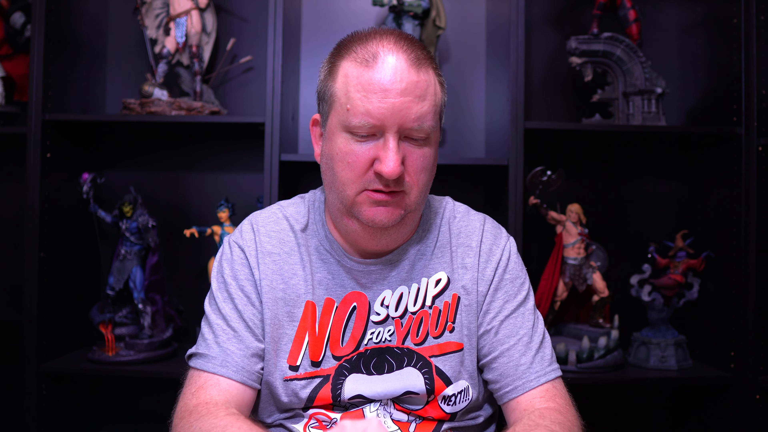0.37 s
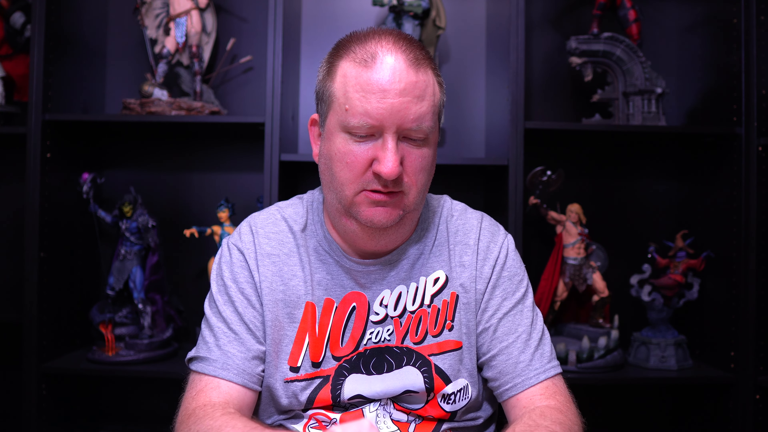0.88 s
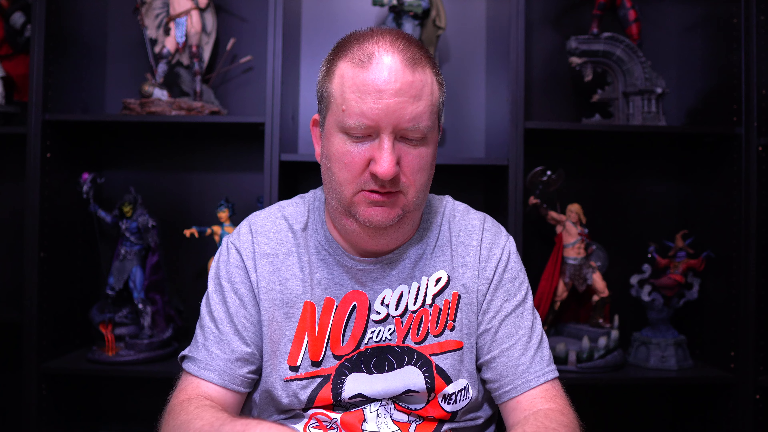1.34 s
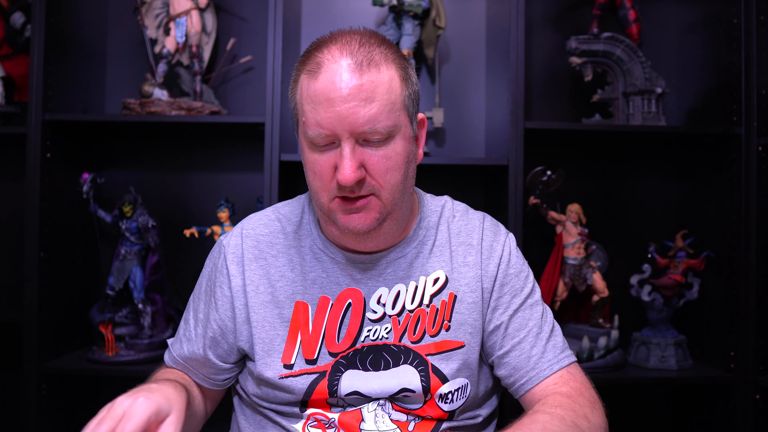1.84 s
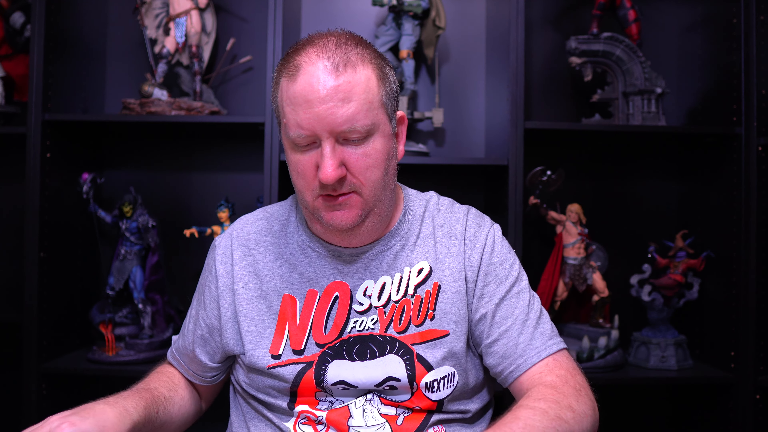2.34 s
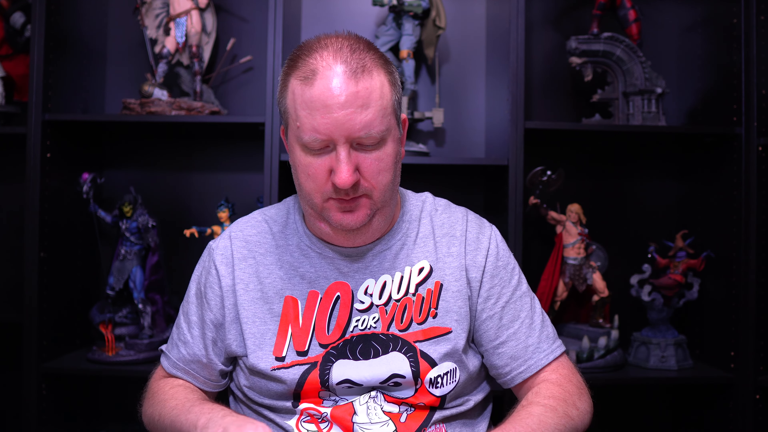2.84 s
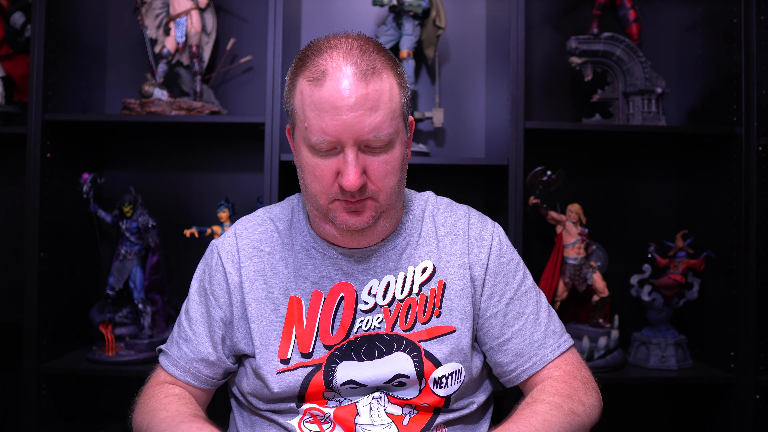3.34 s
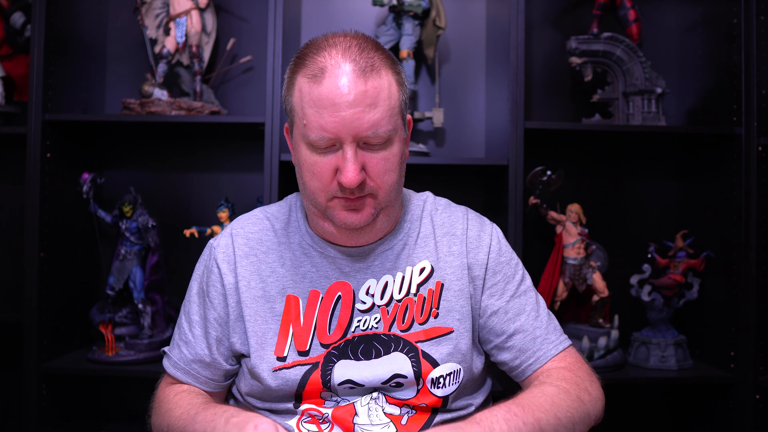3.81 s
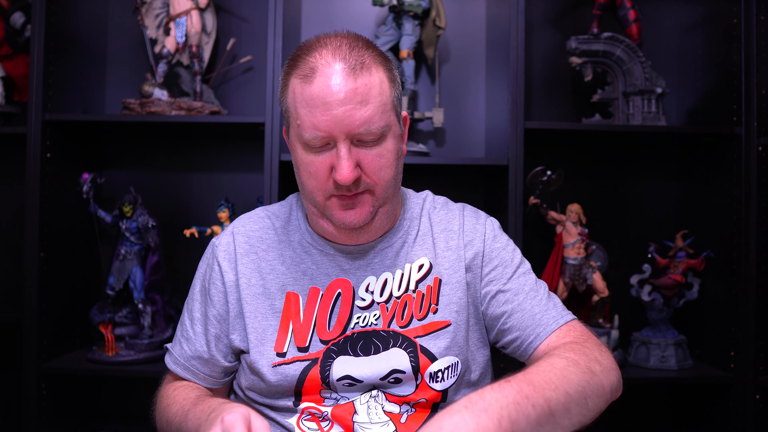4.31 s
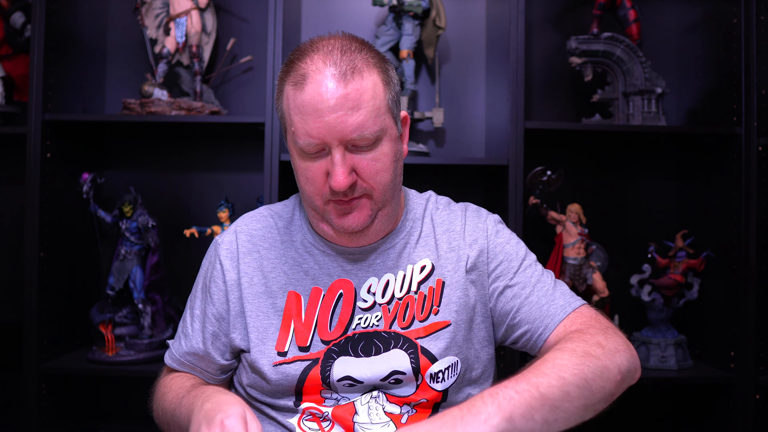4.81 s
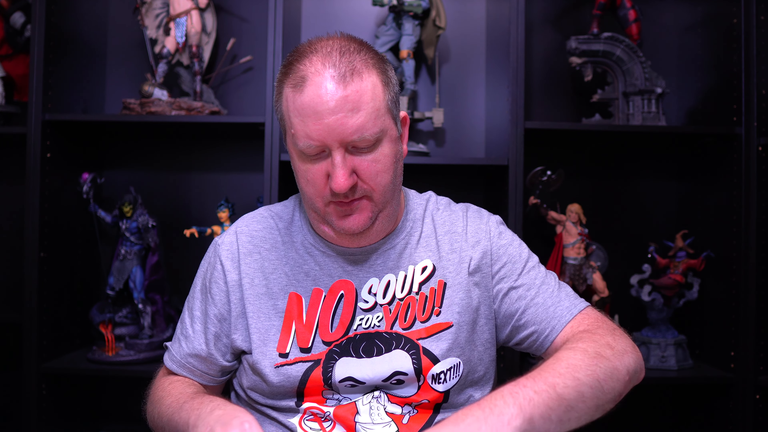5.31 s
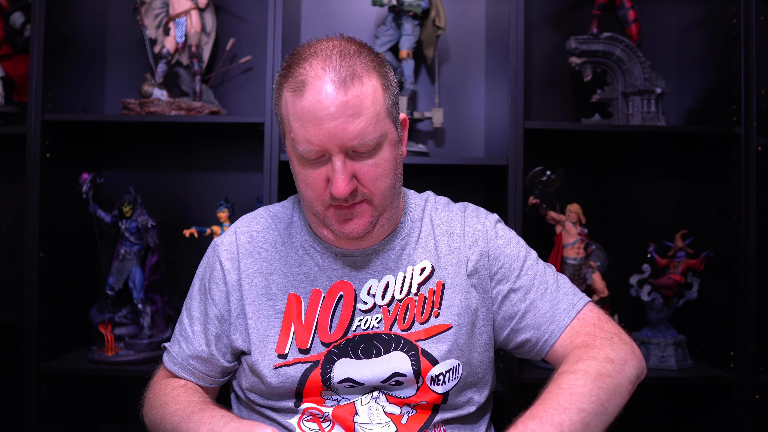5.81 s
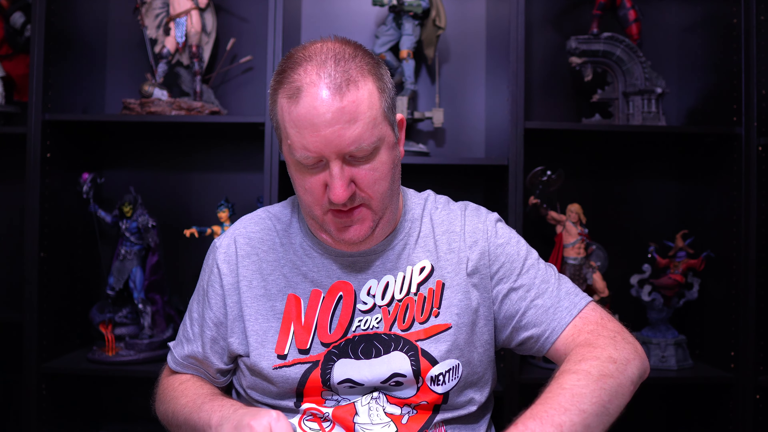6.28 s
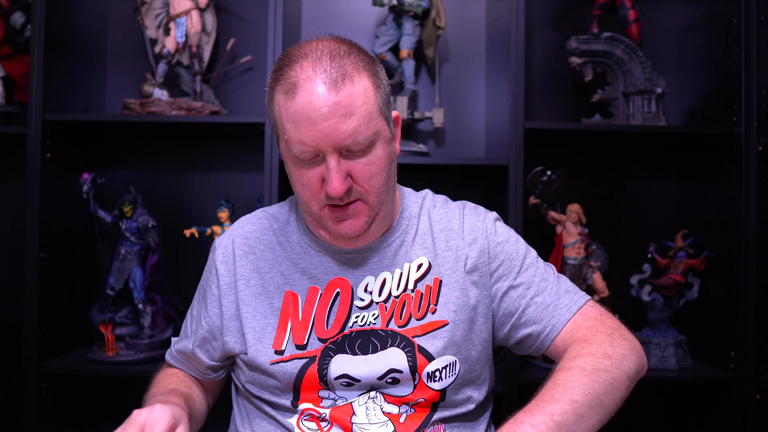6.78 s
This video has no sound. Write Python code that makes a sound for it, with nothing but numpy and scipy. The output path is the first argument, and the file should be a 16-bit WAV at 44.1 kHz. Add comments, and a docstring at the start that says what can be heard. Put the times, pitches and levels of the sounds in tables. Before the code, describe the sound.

Paper crinkles close to a single bright microphone indoors. Dry creases pop irregularly, fingers slide with grainy rustling, and hands knock dully on the desk. The handling is busy at first, thins out before the middle, returns with a hard snap, nearly fades, then ends with strong cracks and small crinkles. Low mains hum and hiss lie beneath.

```python
"""A folded sheet of stiff paper is handled and opened out on a desk in a small shelved room, 7 s.
Mains hum, hiss and a faint treble buzz lie below. From the start creases snap over in short noise cracks,
thickest before 0.5 s, loud at 0.85 s, 3.4 s, 6 s and 6.5 s, sparse and faint from 4.3 to 5.2 s; the room answers.
The sheet rustles in grainy noise, under sliding fingers and as snaps die away; hands bump the desk top
(ringing panel modes). One microphone, bright around 3.3 kHz: a mono scene."""
import sys
import numpy as np
from scipy import signal
from scipy.fft import rfft, irfft
from scipy.io import wavfile

SR = 44100
rng = np.random.default_rng(int(sys.argv[2]) if len(sys.argv) > 2 else 0)


def store_wav(level_fs):
    """Save 16-bit WAV to argv[1]."""
    pcm = np.round(np.clip(np.atleast_2d(level_fs), -1, 1) * 32767)
    wavfile.write(sys.argv[1], SR, pcm.T.astype(np.int16))


def volts_from_db(level):
    """Convert decibel levels to linear amplitude ratios."""
    exponent = np.asarray(level, float) / 20
    return 10 ** exponent


N = 304731   # samples
STEP = 64   # samples between points of the slow level curves


def rms_one(x):
    """Scales x to rms 1."""
    return x / np.sqrt(np.mean(x ** 2) + 1e-20)


def at_hz(points, hz):
    """Reads a table of frequency and value at hz, straight between points in log frequency."""
    table = np.array(points)
    return np.interp(np.log(hz), np.log(table[:, 0]), table[:, 1])


def shaped(x, spectrum):
    """Gives x the colour of a (Hz, dB) table; rms 1."""
    hz = np.maximum(np.fft.rfftfreq(len(x), 1 / SR), 1)
    return rms_one(irfft(rfft(x) * volts_from_db(at_hz(spectrum, hz)), len(x)))


def bandpass(x, order, low_hz, high_hz):
    """Keeps what lies between two frequencies."""
    return signal.sosfilt(signal.butter(order, [low_hz, high_hz], "band", fs=SR, output="sos"), x)


def resonance(x, hz, width_hz):
    """Two-pole resonance with gain 1 on top."""
    r = np.exp(-np.pi * width_hz / SR)
    poles = [1, -2 * r * np.cos(2 * np.pi * hz / SR), r * r]
    return signal.lfilter([(1 - r * r) / 2, 0, (r * r - 1) / 2], poles, x)


def drift(rate_hz):
    """Slow chance with spread 1: noise through two equal low-pass poles at rate_hz."""
    r = np.exp(-2 * np.pi * rate_hz / SR)
    slow = signal.lfilter([1], [1, -2 * r, r * r], rng.standard_normal(N + SR))
    return rms_one(slow[SR:])   # the first second lets the filter settle


def swells(rows, rise_db_per_s, fall_db_per_s):
    """Power gain over time of each row (full from s, held s, ..): steady dB rise, hold at 1, steady dB fall."""
    t = np.arange(0, N + STEP, STEP) / SR
    full_from = np.array(rows)[:, :1]
    held = np.array(rows)[:, 1:2]
    rise_db = rise_db_per_s * np.maximum(full_from - t, 0)
    fall_db = fall_db_per_s * np.maximum(t - full_from - held, 0)
    return volts_from_db(-rise_db - fall_db) ** 2


def every_sample(coarse):
    """Fills in a slow curve to the full sample rate."""
    return np.interp(np.arange(N) / STEP, np.arange(len(coarse)), coarse)


# Mains hum lines at the microphone. Each row: frequency in Hz, typical rms level in dB.
HUM_LINES = [(59.2, -64.5), (177.6, -65), (242.2, -76.5), (301.5, -73.5), (360.7, -90.5)]
# Colour of the steady hiss. Each row: frequency in Hz, relative density in dB per Hz.
HISS_COLOUR = [(12, -36), (20, -2), (60, 0), (130, 2), (177, -32), (222, 6), (319, -2), (399, -5.5),
               (660, -7.5), (1150, -9), (1960, -18), (3340, -6), (6540, -14), (13900, -17.5),
               (16000, -18.5)]
HISS_RMS_DB, BUZZ_RMS_DB = -56.5, -66.5
BUZZ_HZ, BUZZ_SHARPNESS = 120, 4.0   # treble puffs per second; higher sharpness, narrower puffs


def background():
    """Mains lines wavering in level over steady hiss, and treble noise pulsing as a faint buzz."""
    t = np.arange(N) / SR
    hum = 0
    for hz, db in HUM_LINES:
        level = np.sqrt(2) * volts_from_db(db + 0.99 * drift(1))
        hum = hum + level * np.sin(2 * np.pi * (hz * t + rng.random()))
    hiss = shaped(rng.standard_normal(N), HISS_COLOUR)
    puffs = np.exp(BUZZ_SHARPNESS * np.cos(2 * np.pi * BUZZ_HZ * t)) * rng.standard_normal(N)
    buzz = rms_one(bandpass(puffs, 3, 9500, 15000))
    return hum + volts_from_db(HISS_RMS_DB) * hiss + volts_from_db(BUZZ_RMS_DB) * buzz


# How long the small room rings. Each row: frequency in Hz, time to fall by 60 dB in seconds.
RING_TIMES = [(200, 0.63), (530, 0.49), (1400, 0.41), (3700, 0.37), (9700, 0.34), (16000, 0.22)]
# Colour of the reflections at the outset. Each row: frequency in Hz, relative level in dB.
REFLECTION_COLOUR = [(200, 13), (800, -1.5), (3000, 4.5), (8000, 3.5), (16000, -11)]
ROOM_DB, FIRST_WALL_S, FIRST_WALL_DB = -3, 0.01, 4.5


def room(x):
    """Reflections swell until the first wall answers, then die band by band."""
    t = np.arange(SR // 2) / SR
    edges = 150 * 2 ** np.arange(0, 7, .5)   # half-octave bands
    tail = 0
    for low, noise in zip(edges, rng.standard_normal((len(edges), len(t)))):
        high = low * 2 ** .5
        hz = np.sqrt(low * high)
        decay_db = at_hz(REFLECTION_COLOUR, hz) - 60 * t / at_hz(RING_TIMES, hz)
        tail = tail + bandpass(noise, 2, low, high) * volts_from_db(decay_db)
    tail = tail * np.clip((t - FIRST_WALL_S) / 0.013 + 1, 0, 1)
    # the nearest wall stands out for about a millisecond
    tail = tail * volts_from_db(FIRST_WALL_DB * np.exp(-((t - FIRST_WALL_S) / 0.00099) ** 2))
    tail = tail / np.sqrt(np.sum(tail ** 2))
    return volts_from_db(ROOM_DB) * signal.fftconvolve(x, tail)[:N]


# Hands meeting the desk top. Each row: full from in seconds, held in seconds,
# lower mode level in dB, upper mode level in dB.
HAND_BUMPS = [(0.56, .13, -59, -59), (0.83, 0.017, -67, -54), (1.125, 0.0062, -49.5, -41),
              (1.5, 0.012, -55, -50.5), (1.732, .03, -52, -48.5), (2.0, .02, -58, -57),
              (2.15, 0.0092, -47.5, -44), (2.22, 0.0085, -50, -49), (2.37, 0.1, -55, -39),
              (2.46, 0.034, -37, -35), (3.212, 0.085, -56, -57), (3.4, 0.013, -31.5, -35),
              (3.74, 0.013, -49.5, -55), (3.84, 0.011, -51, -65), (4.27, 0.013, -66, -48.5),
              (4.52, .02, -61, -61), (5.29, .01, -56, -54), (5.43, 0.0086, -54, -50),
              (5.56, 0.0071, -69, -58), (5.68, 0.008, -43, -45), (5.89, .02, -48, -41),
              (5.96, 0.018, -42.5, -42.5), (6.18, .03, -58, -64), (6.463, 0.016, -35.5, -37.5),
              (6.56, 0.0086, -46, -47), (6.68, 0.013, -51, -62), (6.74, 0.018, -60, -58),
              (6.87, .01, -66, -74)]
# Lower mode, upper mode and dull body of the desk top. Each row: frequency in Hz,
# width in Hz of the first of two resonances in a chain (the second is twice as wide).
DESK_MODES = [(151, 59), (330, 49), (220, 300)]
BUMP_RISE_DB_PER_S, BUMP_FALL_DB_PER_S = 900, 248
RESTING_HANDS_DB = -68   # floor under both modes
BODY_DB = -11   # against the two mode levels added


def desk():
    """Rubbing and pressing shake the two panel modes of the desk top; its dull body follows both."""
    shake = swells(HAND_BUMPS, BUMP_RISE_DB_PER_S, BUMP_FALL_DB_PER_S)
    levels = []
    for db in np.transpose(HAND_BUMPS)[2:]:
        power = volts_from_db(db) ** 2 @ shake + volts_from_db(RESTING_HANDS_DB) ** 2
        levels.append(every_sample(np.sqrt(power)))
    lower, upper = levels
    ringing = []
    for hz, width_hz in DESK_MODES:
        once = resonance(rng.standard_normal(N), hz, width_hz)
        ringing.append(rms_one(resonance(once, hz, 2 * width_hz)))
    lower_mode, upper_mode, body = ringing
    return lower * lower_mode + upper * upper_mode + volts_from_db(BODY_DB) * (lower + upper) * body


# The microphone's presence peak, and a lower ring of the paper panel. Each row: frequency in Hz, width in Hz,
# boost in dB.
PRESENCE_AND_RING = [(3330, 1070, 10), (1273, 230, 2.5)]


def three_bands(x, low_db, high_db, bottom_hz):
    """Presence peak and panel ring, then lows and highs set against a middle of rms 1."""
    for hz, width_hz, db in PRESENCE_AND_RING:
        x = x + (volts_from_db(db) - 1) * resonance(x, hz, width_hz)
    low = rms_one(bandpass(x, 3, bottom_hz, 1800))
    mid = rms_one(bandpass(x, 3, 1800, 6000))
    high = rms_one(bandpass(x, 3, 6000, 16500))
    return mid - volts_from_db(low_db) * low - volts_from_db(high_db) * high   # opposite signs close the gaps between bands


# Rustling of the sheet: finger strokes, and noise dying away after snaps, the first already fading at the start.
# Each row: full from in seconds, held in seconds, middle-band level in dB,
# lows in dB against the middle, highs in dB against the middle.
RUSTLES = [(0.0, 0.011, -33.5, -9.5, -13.5), (0.16, 0.024, -46, -5, -8), (0.389, .03, -34.5, -5, -6),
           (0.6, 0.087, -46, 0, -5.5), (0.77, 0.068, -47.5, -6, -12), (0.899, 0.024, -35.5, -8.5, -13),
           (1.139, .26, -42, -2.5, -6), (1.511, 0.042, -36.5, -15.5, -13.5), (1.6, 0.21, -44.5, -4.5, -10),
           (1.84, 0.11, -50.5, -8, -1), (1.959, 0.059, -44.5, -11.5, -9), (2.06, .28, -46.5, -8, -6),
           (2.409, 0.15, -43, -2, -5.5), (2.6, 0.075, -47, -11.5, -11.5), (2.72, .1, -59, -4.5, -5),
           (2.87, 0.021, -60, -4, -8), (3.05, 0.18, -60, -5, -13), (3.25, 0.022, -49.5, -6, 0),
           (3.39, 0.019, -34, 0, -0.5), (3.53, 0.022, -48, -12, -18), (3.701, 0.049, -40, -3, -10),
           (3.84, 0.013, -40, -0.5, -9.5), (3.99, 0.27, -44.5, -7.5, -5.5),
           (4.37, 0.015, -48.5, -3.5, -7.5), (4.48, 0.018, -49.5, -5.5, -3),
           (4.535, 0.041, -48, -7.5, -2.5), (4.6, 0.014, -53.5, -13, -8), (4.715, 0.063, -49.5, -18, -10),
           (4.8, 0.024, -55, -1, -2), (4.9, 0.25, -61.5, -9, -9), (5.08, 0.1, -46.5, -16.5, -5),
           (5.33, 0.14, -52, -8, -8), (5.45, 0.12, -51, -8.5, -1.5), (5.57, 0.1, -48.5, -10.5, -6),
           (5.71, 0.097, -46.5, -3.5, -11), (5.89, .02, -34, -3, -11), (5.938, 0.013, -24, -7.5, -6),
           (6.16, 0.035, -46.5, -3, -13), (6.31, 0.015, -45, -10, -11), (6.468, 0.016, -25, -4.5, -7),
           (6.56, .07, -50, -16, -13), (6.74, 0.039, -42.5, -7.5, -15), (6.841, 0.036, -53, -6, -3)]
# Colour of the rustling sheet ahead of the microphone. Each row: frequency in Hz, relative density in dB per Hz.
SHEET_COLOUR = [(180, -9), (300, 7), (593, 4.5), (801, 3.5), (1040, 3), (1120, 5.5), (1300, 0.5),
                (1660, 0.5), (3190, -8), (11300, -19), (16000, -25.5)]
RUSTLE_RISE_DB_PER_S, RUSTLE_FALL_DB_PER_S = 587, 218
CRINKLES_PER_S, CRINKLE_FADE_S = 720, 0.00059   # typical rate, which clumps up and down


def rustle():
    """The sheet's fibres hiss; tiny crinkles, each a millisecond puff, come in clumps on top of it."""
    _, _, db, lows, highs = np.transpose(RUSTLES)
    shapes = swells(RUSTLES, RUSTLE_RISE_DB_PER_S, RUSTLE_FALL_DB_PER_S)
    power = volts_from_db(db)[:, None] ** 2 * shapes + 1e-30
    total = power.sum(axis=0)
    # rows blend their colours by power, so the loudest counts most
    low_db = every_sample(lows @ power / total)
    high_db = every_sample(highs @ power / total)
    born = rng.random(N) < CRINKLES_PER_S * volts_from_db(4.0 * drift(25)) / SR
    sizes = born * volts_from_db(1.6 * np.minimum(rng.exponential(1, N), 4))
    puffs = signal.lfilter([1], [1, -np.exp(-1 / (CRINKLE_FADE_S * SR))], sizes)
    grain = shaped((1.09 + puffs) * rng.standard_normal(N), SHEET_COLOUR)
    level = every_sample(np.sqrt(total))
    low_db = low_db + 0.43 * drift(25.0)
    high_db = high_db + 2.54 * drift(11)
    return level * three_bands(grain, low_db, high_db, bottom_hz=453)


# Creases snapping over, and at 0.874 s a strong room reflection of the crack before it.
# Each row: start in seconds, direct peak in dB, lows in dB against the middle,
# highs in dB against the middle (both before the flap rings), nominal length in ms.
CRACKS = [(0.0408, -16.5, 6, -28, 4.5), (0.1356, -12.5, -6, -7, 2.8), (0.1953, -15, -3, 4.5, 1.5),
          (0.2482, -26.5, 2.5, -16, 2.7), (0.366, -26, 3, -9, 1.9), (0.371, -14, 0, 11, 4.4),
          (0.379, -14.5, -2, 4, 5.2), (0.3866, -15, 2, -2, 7.8), (0.405, -16, -2, -1, 9),
          (0.4232, -18, 16, -20, 2.5), (0.442, -22.5, 1, -23, 2.8), (0.5269, -21.5, 10, -17, 2.9),
          (0.598, -25, 13, 4, 3.3), (0.6636, -30, -1, -23, 9), (0.7132, -35, -9, 6, 1.5),
          (0.734, -27.5, -3, -3, 3.6), (0.8256, -20.5, 38, -14, 1.2), (0.8545, -2.5, -9, -4.5, 2.2),
          (0.874, -9, -7, -5, 2.6), (0.952, -22, 19, -21, 7.7), (1.1167, -29.5, 1, 1, 12),
          (1.1362, -17, 0, 9, 0.22), (1.2234, -22.5, -3, -2, 7), (1.2328, -27, 12, -20, 2.9),
          (1.2921, -19, -2.2, -29, 6), (1.4096, -27.5, 7, -13, 12), (1.4393, -25, 0, -7.5, 4.7),
          (1.493, -15, -3.5, -13, 5.3), (1.646, -31.5, 1, -1, 5.7), (1.6708, -22.5, 3, -1, 4.7),
          (1.713, -20, 8, -16, 16), (1.7812, -34, 13, -21, 3.1), (1.997, -23.5, -5, -2, 5.8),
          (2.1304, -18.5, 8, -24, 4.3), (2.1456, -18.5, 9, -28, 6.6), (2.2287, -19, 3.5, -29, 4.4),
          (2.2854, -36.5, 8, -22.5, 2.5), (2.311, -30.5, -2, -18, 9.5), (2.3617, -26, 0, -12, 2.2),
          (2.4751, -11, -8.5, -25, 4.7), (3.0427, -32.5, -7, -8, 1.6), (3.1962, -22.5, -7.5, -2, 1.8),
          (3.2549, -12.5, -1, -30, 4), (3.3788, 3.5, -26, 0.5, 0.59), (3.4005, -16, -8, -18, 11),
          (3.5406, -23.5, -3, -30, 2.8), (3.6968, -10, -4, -2, 4.3), (3.7278, -20, -7, -21, 3.6),
          (3.7546, -19, -3, -22, 1.3), (3.7752, -22, 2, -5, 2.6), (3.8181, -14.5, -0.5, -4, 3.9),
          (3.9681, -13.5, -2.5, -5, 3.1), (4.0986, -19.5, 4, -17, 2.8), (4.1149, -20.5, 6, -16, 2.6),
          (4.1914, -22, -1, -7, 3.2), (4.299, -26.5, 4, -33.5, 9.5), (4.7047, -40.5, -19, 0, 9),
          (4.8127, -32.5, -4, -9, 3), (4.968, -39.5, -4, -18, 3.4), (5.2887, -17.5, -6.5, -28, 1.4),
          (5.4243, -25.5, 3, -6, 5.3), (5.676, -35.5, 4, -25, 3.5), (5.6802, -17, -8, -25, 2.4),
          (5.689, -26, -20, 0, 2.4), (5.7224, -29, 14, -26, 2.3), (5.7503, -15.5, -5.5, -15, 1.8),
          (5.845, -17.5, 9, -16, 5), (5.8975, -12, -5, 5, 0.6), (5.9055, -10, -32, -5, 10),
          (5.9599, -1, -27, -2, 1.2), (6.158, -21, -0.5, -6, 6.5), (6.303, -12, -17.5, -6.5, 2.5),
          (6.426, -8.5, -7.5, -1, 4.1), (6.452, -22.5, -14, -2.5, 4.8), (6.4727, 2.5, -29, -8, 4.5),
          (6.5522, -17, 1, -3, 7.2), (6.7153, -18.5, -7, -32, 2.1), (6.7329, -27.5, 11, -16, 2.7),
          (6.745, -19, 24, -23, 1.6), (6.7567, -36, 9, -24, 3.8), (6.8116, -15.5, -3, -3.5, 1.1)]
SLOW_SNAP_MS = 2.7   # treble loss grows with length, up to 0.9 of this
SNAP_TO_ROOM_DB = -1   # push into the room for a crack that peaks at -18.5 dB
FAINT_ARE_FAR = 0.097   # dB more into the room for each dB fainter
# every crack carries a flap ringing at its own pitch; its width is a share of that pitch
FLAP_LOWEST_HZ, FLAP_HIGHEST_HZ, FLAP_WIDTH, FLAP_DB = 1005, 8330, 0.11, 8


def snaps():
    """A sharp front and a few ms of slips along the crease; the room gets their energy as one even push."""
    size = 1024   # samples for one crack
    direct, radiated = np.zeros(N + size), np.zeros(N + size)
    t = np.arange(size) / SR
    noises = rng.standard_normal((len(CRACKS), size))
    for (s, peak_db, low_db, high_db, ms), noise in zip(CRACKS, noises):
        chance = np.abs(noise[-1]) * 100 % 1   # spread evenly in log pitch
        flap_hz = FLAP_LOWEST_HZ * (FLAP_HIGHEST_HZ / FLAP_LOWEST_HZ) ** chance
        noise[0] = 1.1 * np.sign(noise[0])   # the sharp front
        slips = noise * np.exp(-(900 * t / max(ms, .05)) ** 1.58)
        crack = three_bands(slips, low_db, high_db, bottom_hz=764)
        # slower snaps lose the very top
        crack = signal.lfilter([1, min(ms / SLOW_SNAP_MS, .9)], [1], crack)
        crack = crack + (volts_from_db(FLAP_DB) - 1) * resonance(crack, flap_hz, FLAP_WIDTH * flap_hz)
        crack = volts_from_db(peak_db) * crack / np.abs(crack).max()
        click = 1.0 * (t == 0)
        push = rms_one(three_bands(click, low_db, high_db, bottom_hz=796))
        to_room_db = SNAP_TO_ROOM_DB - FAINT_ARE_FAR * (peak_db + 18.5)
        i = round(s * SR)
        direct[i:i + size] += crack
        radiated[i:i + size] += volts_from_db(to_room_db) * np.std(crack) * push
    return direct[:N], radiated[:N]


def scene():
    """Paper, room, desk and background at one microphone: a mono scene, and the weak trace beside it."""
    direct, radiated = snaps()
    rustling = rustle()
    reflections = room(radiated + volts_from_db(-4.5) * rustling)
    mono = direct + rustling + reflections + desk() + background()
    smear = rng.standard_normal(1024) / 32
    trace = volts_from_db(-36) * signal.fftconvolve(mono, smear)[:N]   # weak and decorrelated, no part of the scene itself
    return mono + trace * np.array([[1], [-1]])


def roll_off(x):
    """The treble ends steeply here."""
    return signal.sosfilt(signal.butter(12, 16540, fs=SR, output="sos"), x)


def record(dry):
    """The recorder rolls off the top above 15.7 kHz and rounds the peaks."""
    rolled = signal.sosfilt(signal.butter(4, 15700, fs=SR, output="sos"), dry)
    rounded = 1.313 * np.tanh(rolled / 1.714)
    return roll_off(rounded)


dry = scene()
out = record(dry)
store_wav(out)
```